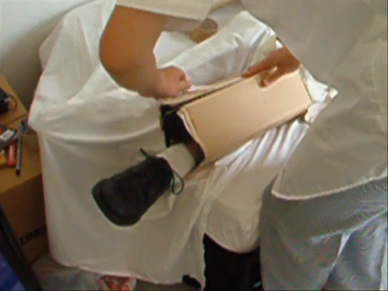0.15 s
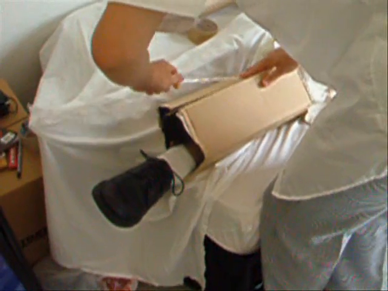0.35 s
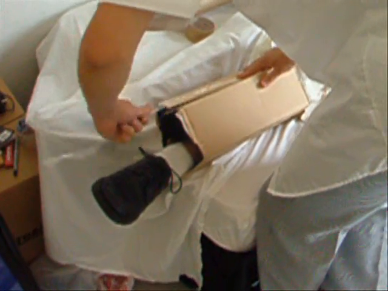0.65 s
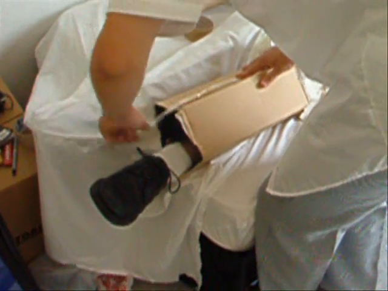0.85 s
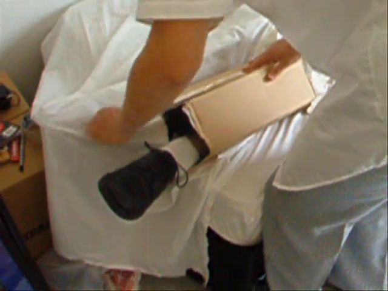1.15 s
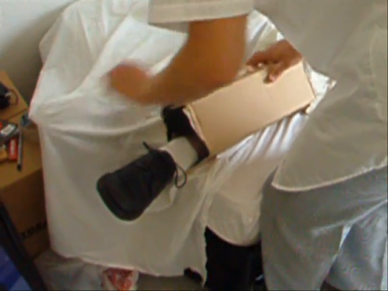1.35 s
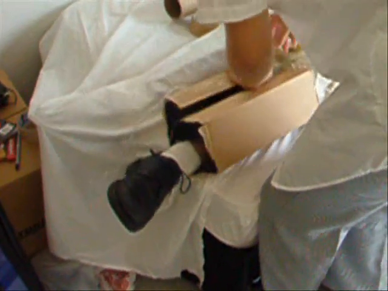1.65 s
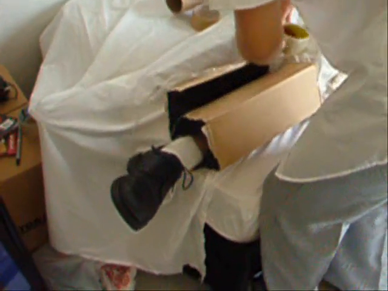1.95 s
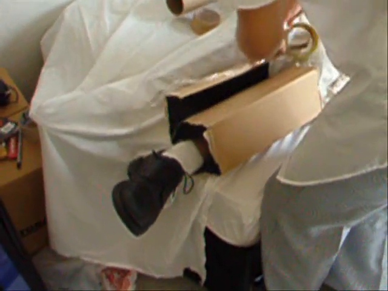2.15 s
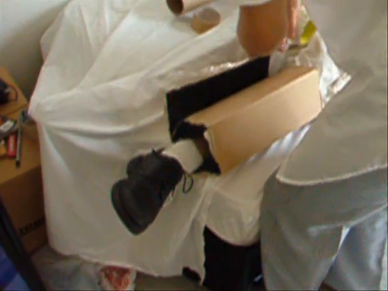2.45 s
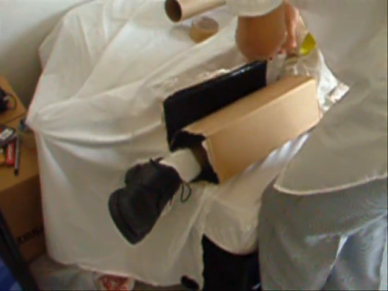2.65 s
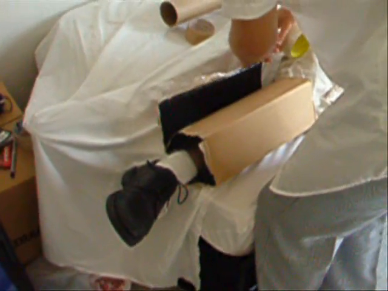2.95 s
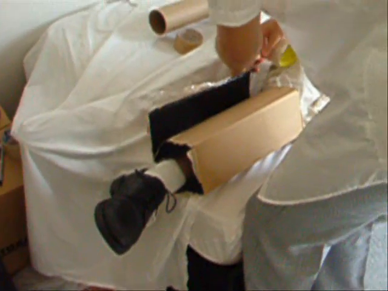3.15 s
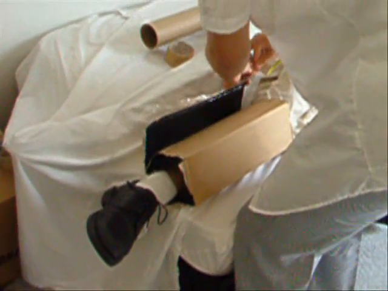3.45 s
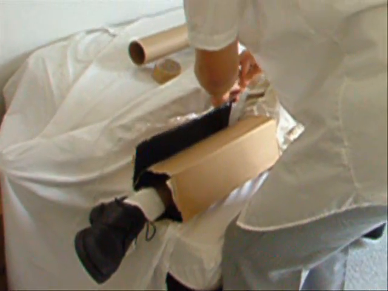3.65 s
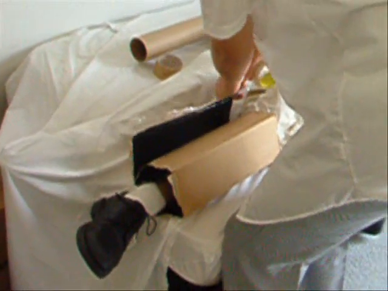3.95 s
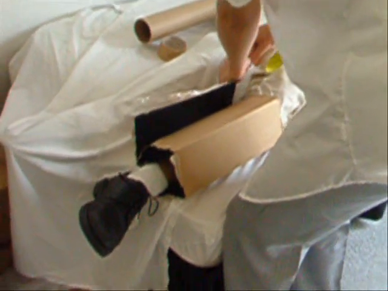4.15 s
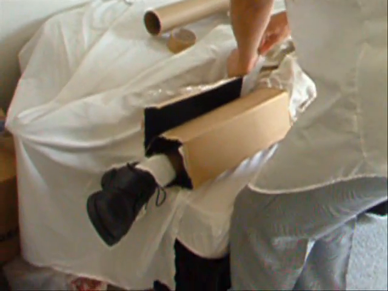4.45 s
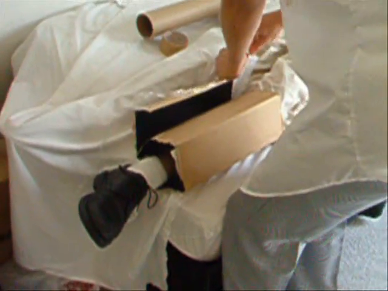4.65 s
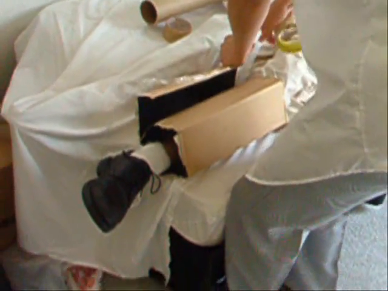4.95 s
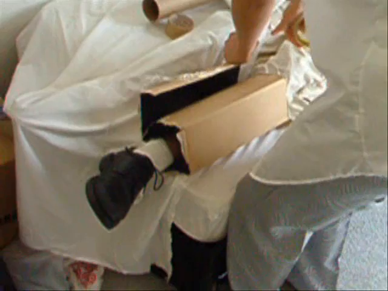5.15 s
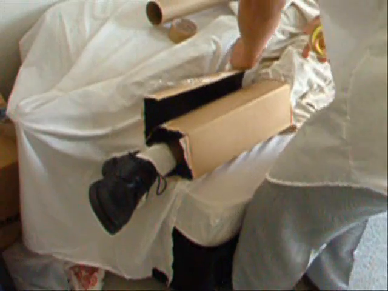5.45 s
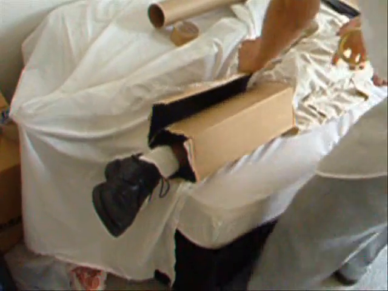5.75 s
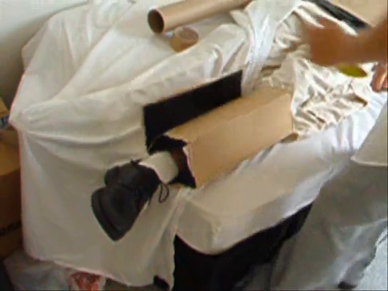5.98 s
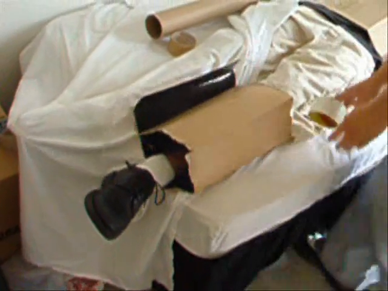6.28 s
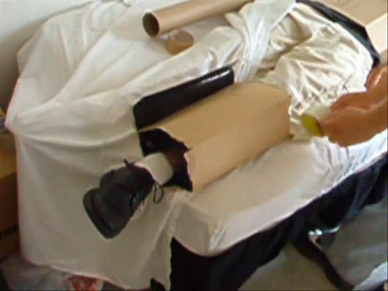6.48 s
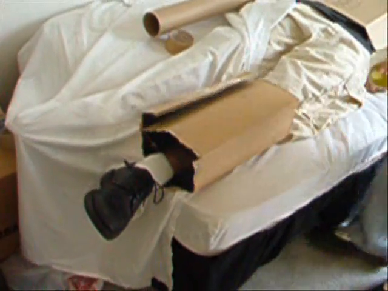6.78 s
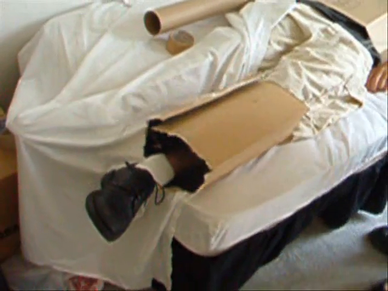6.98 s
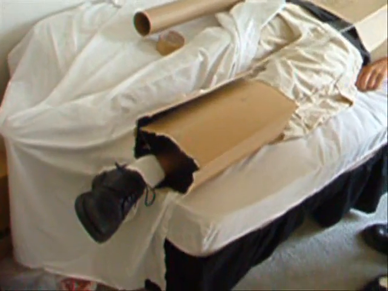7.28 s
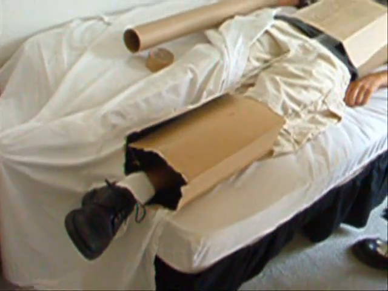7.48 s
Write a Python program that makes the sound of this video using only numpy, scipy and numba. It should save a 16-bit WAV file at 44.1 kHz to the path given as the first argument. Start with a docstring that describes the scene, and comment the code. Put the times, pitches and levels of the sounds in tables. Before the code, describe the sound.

Adhesive tape is peeled off a cardboard box in short crackling rips and sharp snaps, while hands knock the box softly and a bed sheet rustles faintly. The cardboard rattles as it is pulled open. After a lull come clusters of crisp snaps from a tape roll, then a longer crackling pull. It is close, in a small room, through a thin, hissy, gritty microphone.

```python
"""Sharp snaps and crackle of adhesive tape, close by in a small room: hands peel it off a cardboard box
on a bed, pull the box open and pick at a roll of tape. Glue bonds and creases let go singly or in swarms,
and both shake the box walls. Underneath, hands knock the box softly, the sheet rustles and the room answers.
The microphone is a small camera's, thin and hissy, into a coarse converter with a slow clock."""
import sys
import numpy as np
from scipy import signal
from scipy.fft import rfft, irfft
from scipy.io import wavfile
from scipy.ndimage import uniform_filter1d, map_coordinates
from numba import njit

SR = 44100
rng = np.random.default_rng(int(sys.argv[2]) if len(sys.argv) > 2 else 0)


def output_pcm(signal):
    """Save a mono or channel-first signal as 16-bit PCM at the path in sys.argv[1].

    Samples are clipped to [-1, 1] before scaling.
    """
    pcm = np.clip(np.atleast_2d(signal).T, -1, 1) * 32767
    wavfile.write(sys.argv[1], SR, np.round(pcm).astype(np.int16))


N = 336042


def undb(db):
    """Decibels to amplitude."""
    return 10 ** (np.asarray(db) / 20)


def unit(x):
    """Scale to an RMS of 1."""
    return x / np.sqrt(np.mean(x ** 2))


def band(x, lo_hz, hi_hz):
    """Gentle band-pass."""
    return signal.sosfilt(signal.butter(2, [lo_hz, hi_hz], "band", fs=SR, output="sos"), x)


def curve(table, t):
    """Straight lines between (time_s, value) points."""
    return np.interp(t, *np.transpose(table))


def flutter(rate_hz):
    """Random levels, each held 1 / rate_hz seconds and slewed; spread near 1."""
    hold = int(SR / rate_hz)
    return uniform_filter1d(np.repeat(rng.standard_normal(N // hold + 1), hold), hold // 2)[:N]


@njit
def grains(start, hz, cycles, gain):
    """Sum of sines, each dying by 1 / e in the given number of cycles."""
    out = np.zeros(N)
    for k in range(len(start)):
        turn = np.exp((2j * np.pi - 1 / cycles) * hz[k] / SR)
        phasor = gain[k] + 0j
        for i in range(start[k], min(N, start[k] + int(6 * cycles * SR / hz[k]))):
            out[i] += phasor.imag
            phasor *= turn
    return out


def convolve_changing(x, response, hop):
    """Convolve overlapping pieces of x, hop samples apart, each with a fresh response()."""
    out, fade = np.zeros(N + SR), np.hanning(2 * hop + 1)[:-1]
    x = np.concatenate([np.zeros(hop), x, np.zeros(2 * hop)])
    for i in range(0, N + hop, hop):
        part = signal.fftconvolve(x[i:i + 2 * hop] * fade, response())
        out[i:i + len(part)] += part
    return out[hop:hop + N]


def hiss(level_db=-61):
    """A faint, slightly wavering noise floor at the microphone."""
    return undb(level_db + 1.5 * flutter(5.4)) * unit(band(rng.standard_normal(N), 200, 6000))


# The small room's tail, band by band: centre_hz, t60_s, relative_db
ROOM_BANDS = [(994, 0.42, -14), (2415, 0.24, -8.5), (5993, 0.24, -7.5)]

def room(direct, echo_s=.0033, echo_db=-6.5, echo_spread=.19):
    """A nearby wall sends one echo, then a diffuse tail, treble dying first; moving hands change both."""
    t = np.arange(SR // 3) / SR
    onset = np.clip(t / .0041 - .5, 0, 1)

    def response():
        out = np.zeros(len(t))
        for hz, t60, db in ROOM_BANDS:
            tail = band(rng.standard_normal(len(t)), hz / 2, hz * 2) * 1000 ** (-t / t60) * onset
            out += undb(db) * tail / np.sqrt(3 * np.sum(tail ** 2))
        delay_s = echo_s * (1 + echo_spread * rng.uniform(-1, 1))
        out[int(delay_s * SR)] += undb(echo_db)
        return out
    return direct + convolve_changing(direct, response, hop=8192)


# Rustle down on the bed, under the box: time_s, level_db
SHEET_LEVELS = [(0, -50.5), (.5, -53), (.8, -47.5), (1.6, -45), (2.6, -50.5), (3.4, -58), (4.05, -47),
                (4.6, -60.5), (6.1, -51), (6.5, -58.5), (7.2, -44)]

def sheet_rustle(lump_db=4.0):
    """The sheet rustles low and unevenly while the hands work."""
    level_db = curve(SHEET_LEVELS, np.arange(N) / SR) + lump_db * flutter(25)
    return undb(level_db) * unit(band(rng.standard_normal(N), 100, 400))


# Hands bumping the box, ahead of the microphone's bass loss: start_s, level_db, nominal_pitch_hz
HAND_KNOCKS = [(.336, -24, 461), (.62, -46, 335), (.735, -29, 390), (.82, -36, 327), (.92, -47, 410),
               (1.065, -34, 304), (1.115, -33, 454), (1.165, -34, 396), (1.299, -21.5, 509),
               (1.41, -30.5, 445), (1.55, -40, 396), (2.159, -15.5, 150), (5.161, -20, 183)]

def hand_knocks(cycles=2.7, upper_db=-5):
    """Each knock is a dull pair of panel tones, one below and one above its nominal pitch."""
    start_s, db, hz = np.repeat(np.transpose(HAND_KNOCKS), 2, axis=1)
    hz = hz * np.tile([.8, 1.5], len(HAND_KNOCKS))
    db = db + np.tile([0, upper_db], len(HAND_KNOCKS))
    return grains((start_s * SR).astype(np.int64), hz, cycles, undb(db))


# Modes of the cardboard walls: pitch_hz, relative_db, t60_s
BOX_MODES = [(554, -16.5, 0.033), (766, -14.5, 0.024), (902.4, -4, 0.038), (1099, -9, 0.028),
             (1306, 0.5, 0.025), (1611, 3, 0.015), (1890, -2.5, 0.022), (2136, 4.5, 0.044),
             (2458, 10.5, .015), (2583, 0.5, .015)]

def box_walls(push, flex=.074, touch_db=3):
    """The walls ring briefly; as the box is bent and gripped elsewhere, modes shift and trade strength."""
    hz, db, t60 = np.transpose(BOX_MODES)[:, :, None]
    t = np.arange(SR // 12) / SR

    def response():
        bend, touch = rng.standard_normal((2, len(BOX_MODES), 1))
        tones = np.sin(2 * np.pi * hz * (1 + flex * bend) * t)
        ring = undb(db + touch_db * touch) * tones * 1000 ** (-t / t60)
        return ring.sum(0) / np.sqrt(np.sum(ring ** 2))
    return convolve_changing(push, response, hop=1500)


# Strips of tape letting go in one pull: start_s, length_s, level_db
TAPE_RIPS = [(.022, 0.018, -32.5), (0.224, 0.046, -37), (0.282, 0.057, -32.5), (0.318, 0.043, -35),
             (0.652, 0.048, -36.5), (0.708, 0.041, -29.5), (0.816, 0.017, -34), (1.014, 0.04, -36),
             (1.283, 0.028, -33.5), (1.702, 0.059, -27), (1.884, 0.0055, -25.5), (1.942, 0.059, -32.5),
             (2.068, 0.041, -24), (2.154, 0.004, -27), (2.237, 0.008, -32), (2.289, 0.023, -34.5),
             (2.323, 0.049, -28), (2.438, 0.096, -22.5), (2.633, 0.0079, -23), (2.683, 0.038, -24),
             (2.874, 0.015, -35), (2.908, 0.011, -30.5), (3.234, 0.062, -42), (3.512, 0.048, -43.5),
             (4.937, 0.034, -29), (5.266, 0.075, -31), (5.53, 0.0081, -29.5), (5.67, .075, -30),
             (5.863, 0.038, -34.5), (6.037, 0.045, -35), (6.098, 0.098, -28.5), (6.778, 0.016, -31),
             (6.802, 0.15, -25.5), (6.935, 0.016, -24.5), (6.96, 0.024, -25), (6.988, 0.079, -24),
             (7.149, 0.033, -26.5), (7.192, 0.18, -29), (7.284, 0.11, -27), (7.398, 0.14, -27),
             (7.578, 0.14, -28.5)]

def rip_power(attack_s=.0022, swell_db=4.0):
    """Power of the rips over time: each starts quickly, and the longer pulls swell and taper."""
    out = np.zeros(N)
    for start_s, length_s, db in TAPE_RIPS:
        release_s = .006 + .2 * length_s
        first, end = int(start_s * SR), int((start_s + length_s + release_s) * SR)
        span = np.arange(first, min(end, N))
        age = span / SR - start_s
        gate = np.clip(age / attack_s, 0, 1) * np.clip((length_s - age) / release_s + .5, 0, 1) ** 2
        arch = np.sin(np.pi * np.clip(age / length_s, 0, 1)) - 1
        out[span] += gate * undb(db + swell_db * arch * min(length_s / .06, 1)) ** 2
    return out


# Slow handling of the tape, between and under the rips: time_s, level_db
HANDLING_LEVELS = [(0, -40), (.25, -49), (.5, -52.5), (.8, -50.5), (1.23, -45.5), (1.47, -53.5),
                   (1.9, -41.5), (2.55, -46), (3.03, -56), (3.48, -50), (3.65, -55), (4.15, -41.5),
                   (4.65, -59), (4.9, -58), (5.07, -38.5), (5.56, -46), (5.84, -55), (6.07, -44),
                   (6.3, -53.5), (6.56, -58.5), (6.85, -35), (7.41, -37), (7.53, -44)]
# Drive on the box against the tape film, strong while prising it open, weak while picking at the roll.
# Rips follow it fully, handling and snaps in part: time_s, coupling_db
BOX_COUPLING = [(0, -16), (1.1, -18.5), (1.7, -7), (1.97, 1), (2.15, -6.5), (2.32, -2), (2.9, -7),
                (3.5, -11), (4.9, -12.5), (5.3, -12), (5.8, -26.5), (6.1, -15.5), (6.9, -15.5),
                (7.1, -18.5), (7.6, -17)]

def pull_strength():
    """How hard handling and rips work the tape: amplitude envelopes for (film, box walls)."""
    t = np.arange(N) / SR
    handling, rips = undb(curve(HANDLING_LEVELS, t)) ** 2, rip_power()
    coupling_db = curve(BOX_COUPLING, t)
    wall_power = handling * undb(-8.5 + .15 * coupling_db) ** 2 + rips * undb(coupling_db) ** 2
    return np.sqrt(handling + rips), np.sqrt(wall_power)


def tape_crackle(breaks_per_s=7000, scatter_db=3.0, cap_db=13, mid_hz=6200, cycles=1.7, lump_db=2.0):
    """Swarms of tiny breaks, mostly faint with a few strong ones: (film sound, push on the box)."""
    draws = rng.random((90000, 4))
    start = (np.cumsum(-np.log(1 - draws[:, 0])) * SR / breaks_per_s).astype(np.int64)
    _, pitch, size, sign = draws[start < N].T
    start = start[start < N]
    gain = undb(np.minimum(-scatter_db * np.log(1 - size), cap_db)) * np.sign(sign - .5)
    pitch_hz = np.clip(mid_hz * (pitch / (1 - pitch)) ** .2, 500, 12000)
    film = grains(start, pitch_hz, cycles, gain)
    push = np.bincount(start, gain, N)
    on_film, on_walls = pull_strength() * undb(lump_db * flutter(60))  # the peeling goes in jerks
    return unit(film) * on_film, unit(push) * on_walls


# Single snaps of the tape film, in the foreground: start_s, peak_db, pitch_hz
TAPE_SNAPS = [(0.0054, -10.5, 4140), (0.0276, -15.5, 6900), (0.0388, -16, 4080), (0.1248, -15, 5500),
              (0.3305, -12.5, 6700), (0.594, -15.5, 6370), (0.6143, -15, 5670), (0.622, -11.5, 5100),
              (0.7293, -16, 2980), (0.833, -17.5, 4000), (0.9313, -16, 5600), (0.9833, -13, 5020),
              (1.066, -15.5, 4400), (1.2968, -14.5, 3380), (1.3306, -15.5, 5970), (1.5438, -28.5, 5300),
              (1.5906, -17.5, 2400), (1.6223, -14.5, 4050), (1.7669, -10.5, 4130), (1.8605, -13, 2530),
              (1.916, -14.5, 3960), (1.944, -8.5, 2450), (2.1604, -2.5, 6200), (2.3396, -11, 1960),
              (2.4326, -8.5, 6200), (2.6337, -15, 2010), (2.868, -16, 2000), (2.9378, -13.5, 6020),
              (3.0521, -12, 4530), (3.226, -16.5, 6430), (3.3095, -19.5, 3550), (3.4282, -17.5, 7280),
              (3.5111, -19, 6030), (3.6186, -10.5, 6220), (4.0973, -16, 4270), (4.15, -7, 6950),
              (4.1616, -9.5, 5730), (4.2287, -20, 2200), (4.2469, -3.5, 6230), (4.266, -10.5, 5700),
              (4.2801, -11.5, 5400), (4.3256, -8, 6500), (4.3776, -6, 6360), (4.4251, -10, 6430),
              (4.5699, -21.5, 5060), (4.6925, -34, 6640), (4.825, -25, 6800), (4.8865, -5.5, 4870),
              (4.9057, -6.5, 5840), (4.9275, -8.5, 5800), (4.9552, -8, 5800), (4.989, -6, 6670),
              (5.045, -11.5, 2310), (5.0782, -8, 6960), (5.0926, -8, 6100), (5.1102, -5, 5330),
              (5.1622, -6, 3000), (5.239, -11, 2970), (5.265, -5, 5770), (5.295, -8, 5730),
              (5.367, -15.5, 5900), (5.385, -20, 7160), (5.4198, -11, 5600), (5.522, -12.5, 6500),
              (5.5357, -10.5, 4170), (5.5713, -16, 5240), (5.5825, -12.5, 6040), (5.6253, -18, 5340),
              (5.66, -13.5, 5200), (5.7087, -11, 6600), (5.7307, -6, 5750), (5.863, -16, 2300),
              (5.876, -10, 5760), (5.892, -9.5, 6050), (5.989, -10.5, 5670), (6.0245, -14.5, 5220),
              (6.2941, -28, 4540), (6.473, -16.5, 6140), (6.4984, -19, 5040), (6.631, -17.5, 6030),
              (6.6446, -16, 5700), (6.701, -19.5, 5030), (6.965, -3, 6200), (7.0379, -9, 6300),
              (7.092, -11, 4140), (7.1177, -9.5, 6600)]

def tape_snaps(tear_s=.0007, after_s=.02, after_db=-17, log_width=.33, skirt_db=-14, jerk_spread_db=3.5):
    """A bond tears in a quick run of breaks that rings the film broadly: (film sound, jerk on the box)."""
    start_s, db, hz = np.transpose(TAPE_SNAPS)[:, :, None]
    span = 2048
    t = np.arange(span) / SR
    noise = rng.standard_normal((len(start_s), span))
    breaks = np.sign(noise) * np.abs(noise) ** 1.8  # spiky, for grit
    # the glue around the break keeps letting go for a moment
    breaks *= np.exp(-t / tear_s) + undb(after_db) * np.exp(-t / after_s)
    bin_hz = np.arange(1, span // 2 + 2) * SR / span
    resonance = np.exp(-.5 * (np.log(bin_hz / hz) / log_width) ** 2)
    skirt = undb(skirt_db) * np.clip(bin_hz / 2000, 0, 1)
    film = np.roll(irfft(rfft(breaks) * (resonance + skirt)), 8, axis=1)
    film *= undb(db) / np.abs(film).max(axis=1, keepdims=True)
    coupling_db = -11.5 + .23 * curve(BOX_COUPLING, start_s) + jerk_spread_db * noise[:, -1:]
    jerk = breaks * undb(db + coupling_db) / np.abs(breaks).max(axis=1, keepdims=True)
    place = ((start_s * SR).astype(int) + np.arange(span)).ravel()
    return np.bincount(place, film.ravel(), N)[:N], np.bincount(place, jerk.ravel(), N)[:N]


def scene():
    """Tape, box and bed as they reach one microphone in the room, over the hiss."""
    snaps, jerk = tape_snaps()
    crackle, push = tape_crackle()
    floor = hiss()
    direct = snaps + crackle + hand_knocks() + sheet_rustle() + box_walls(jerk + push)
    return (room(direct) + floor)[None]


def record(dry, low_hz=647, high_hz=8144, peak_hz=8200, peak_db=5.4, clock_hz=16001.4, step=1 / 128):
    """Thin, peaky microphone, coarse steps; holding each value mirrors the sound above half the clock."""
    mic = band(band(dry[0], low_hz, 12000), low_hz / 2, high_hz)
    resonance = signal.lfilter(*signal.iirpeak(peak_hz, peak_hz / 2500, SR), mic)
    mic = mic + (undb(peak_db) - 1) * resonance
    tick = np.floor(np.arange(N) * clock_hz / SR)
    held = map_coordinates(mic, [tick * SR / clock_hz], order=3)
    stepped = step * np.round((held - .00081) / step)  # the offset makes faint sound tick downwards first
    stepped = np.clip(stepped, -1, 1 - step)
    top_cut = signal.ellip(14, .2, 80, 15760, fs=SR, output="sos")
    return signal.sosfilt(top_cut, stepped)[None]


dry = scene()
out = record(dry)
output_pcm(out)
```